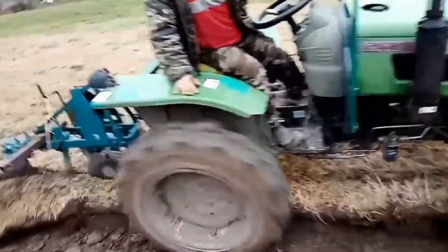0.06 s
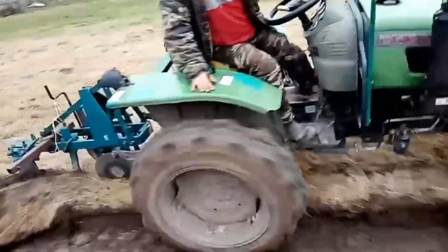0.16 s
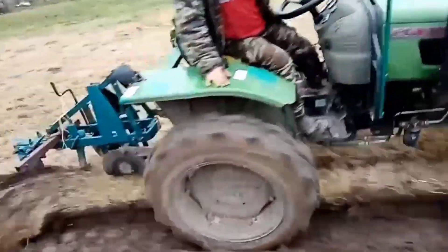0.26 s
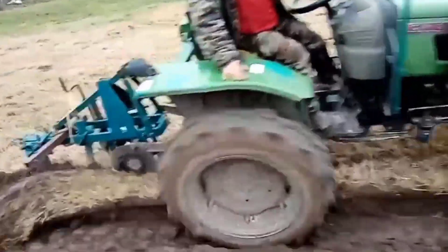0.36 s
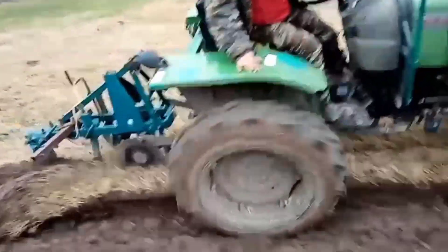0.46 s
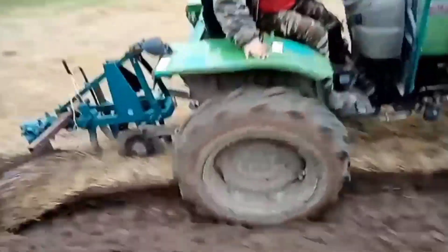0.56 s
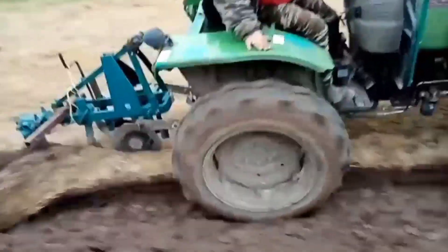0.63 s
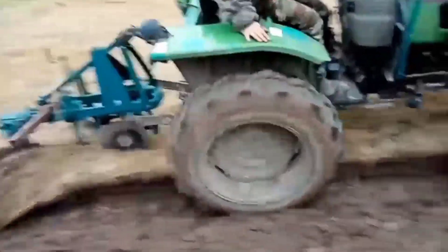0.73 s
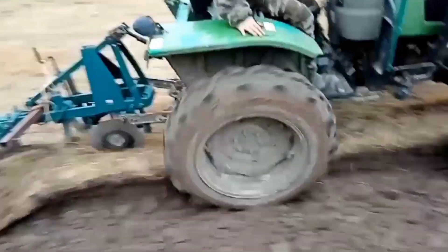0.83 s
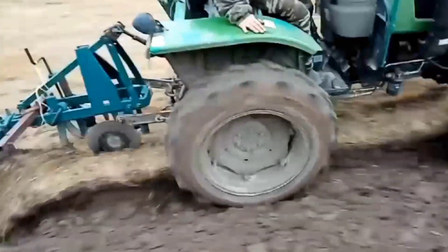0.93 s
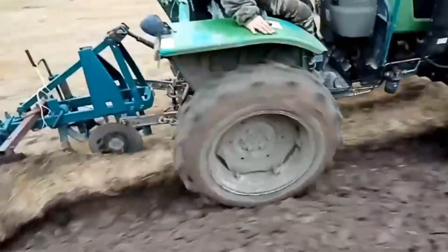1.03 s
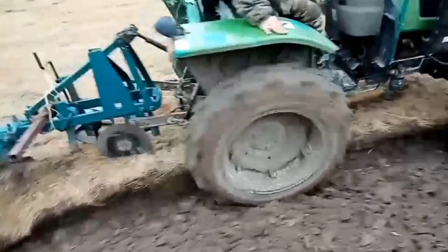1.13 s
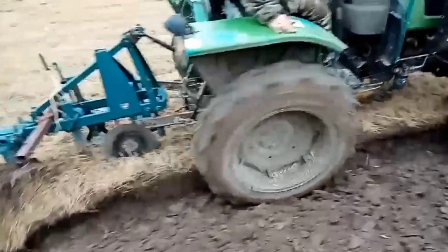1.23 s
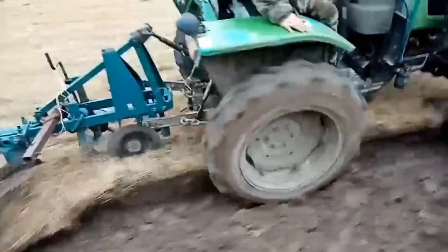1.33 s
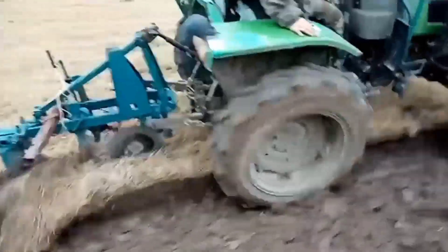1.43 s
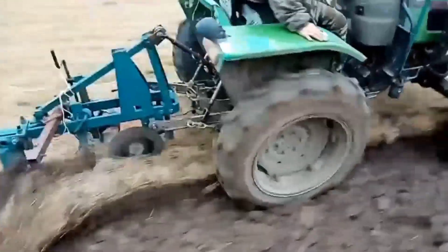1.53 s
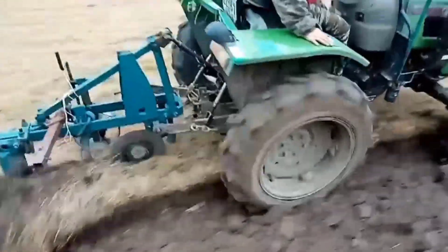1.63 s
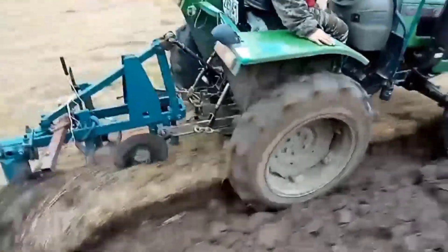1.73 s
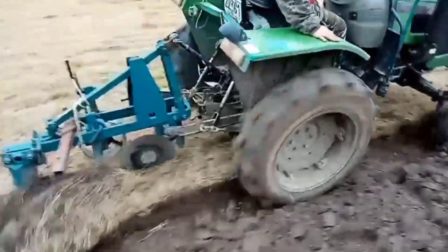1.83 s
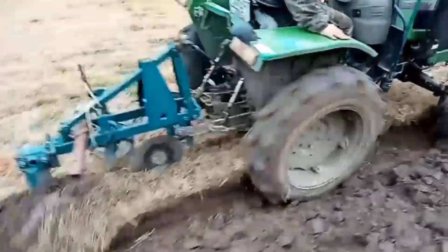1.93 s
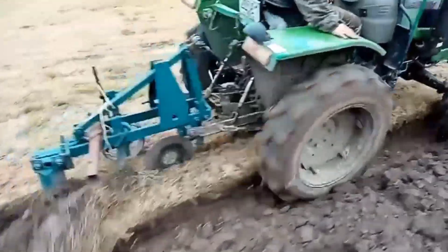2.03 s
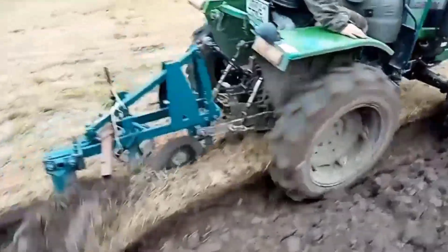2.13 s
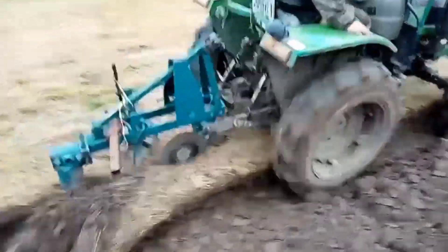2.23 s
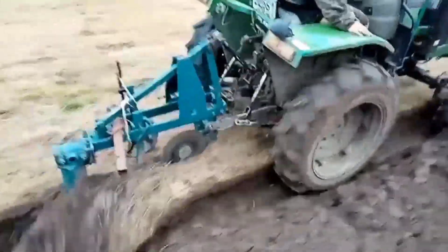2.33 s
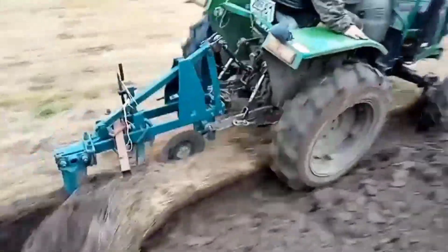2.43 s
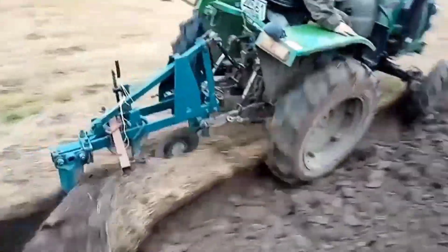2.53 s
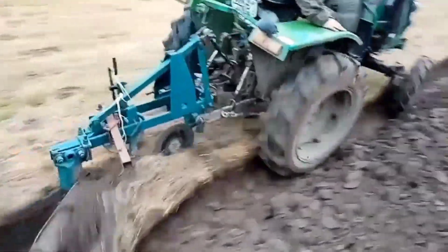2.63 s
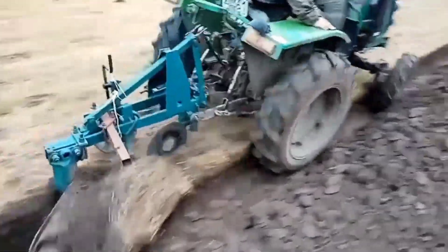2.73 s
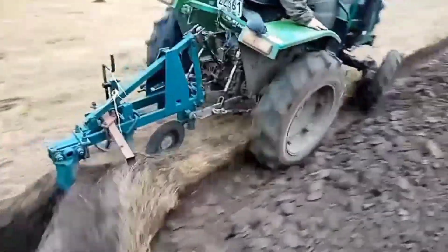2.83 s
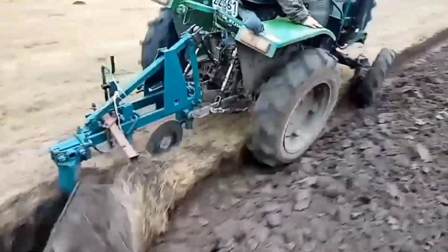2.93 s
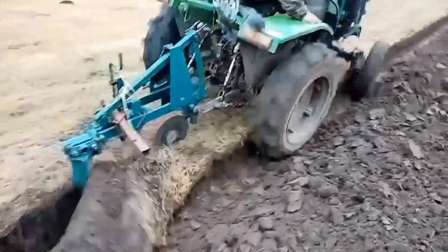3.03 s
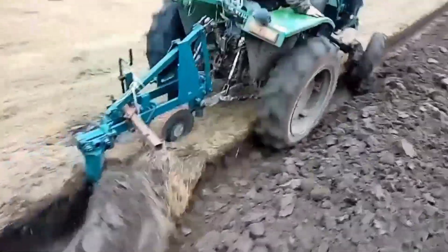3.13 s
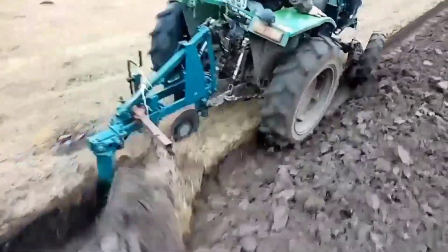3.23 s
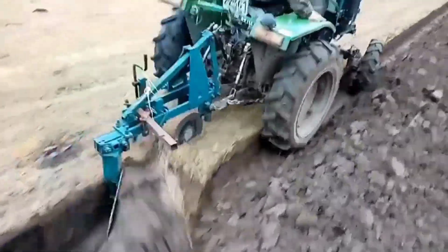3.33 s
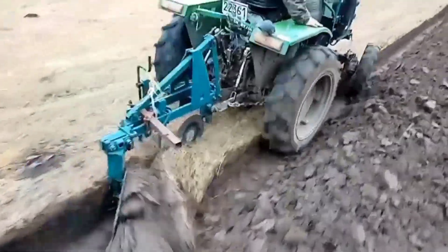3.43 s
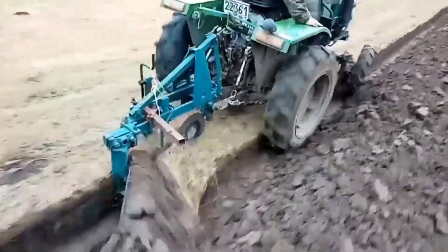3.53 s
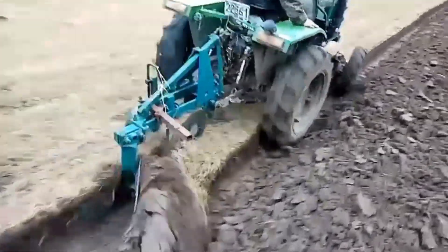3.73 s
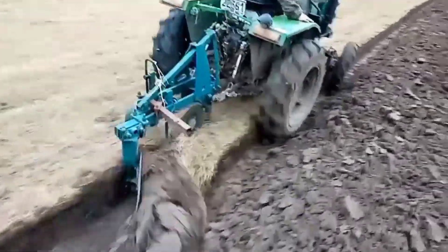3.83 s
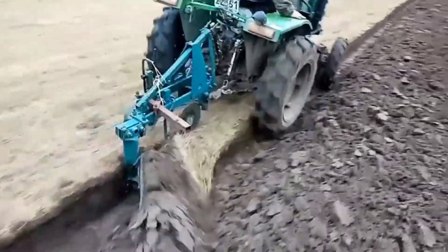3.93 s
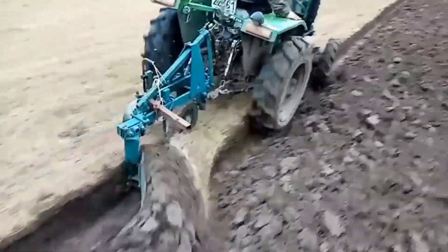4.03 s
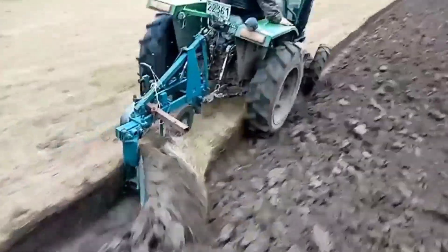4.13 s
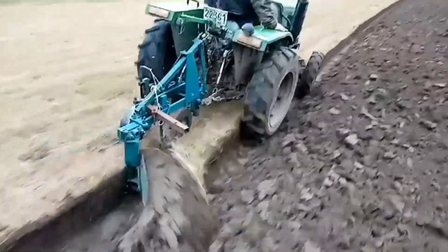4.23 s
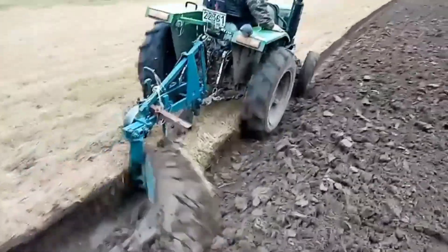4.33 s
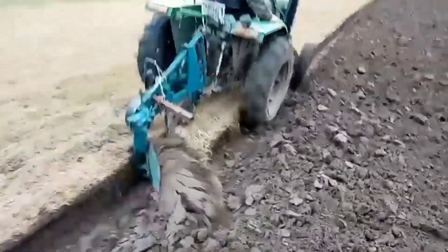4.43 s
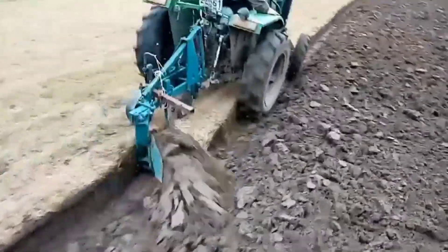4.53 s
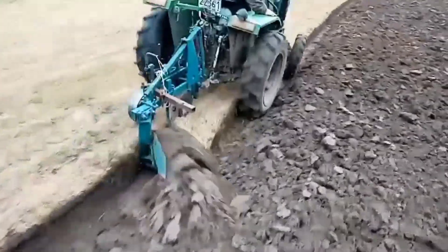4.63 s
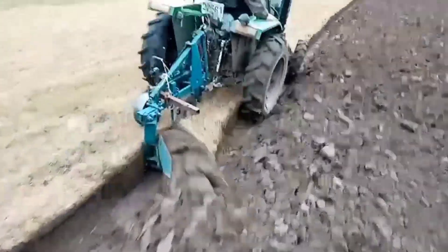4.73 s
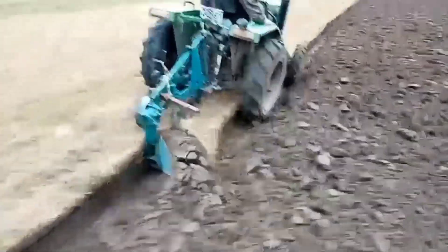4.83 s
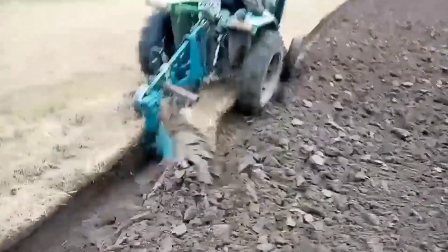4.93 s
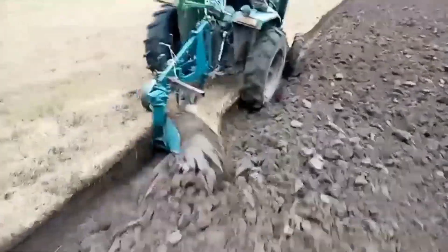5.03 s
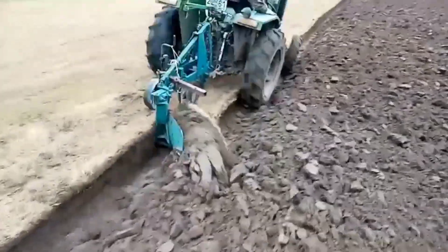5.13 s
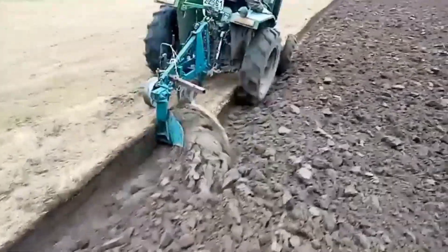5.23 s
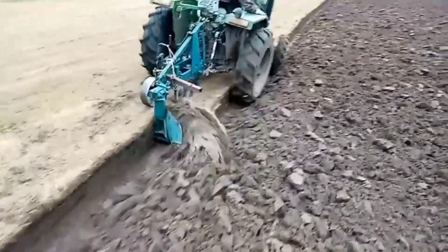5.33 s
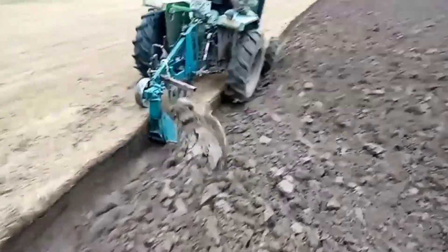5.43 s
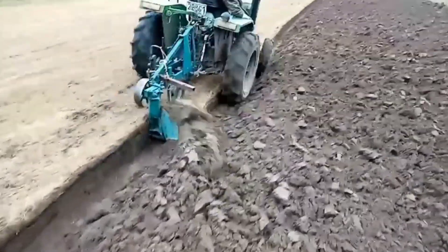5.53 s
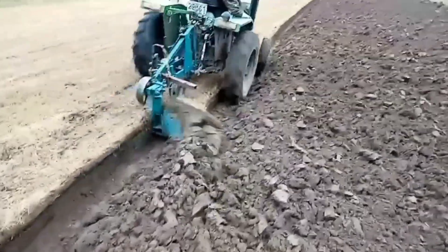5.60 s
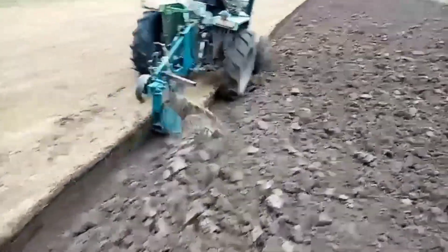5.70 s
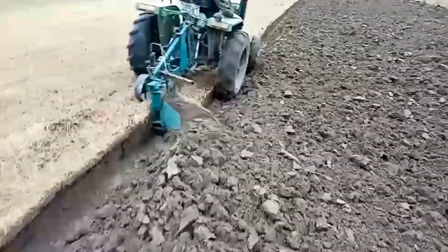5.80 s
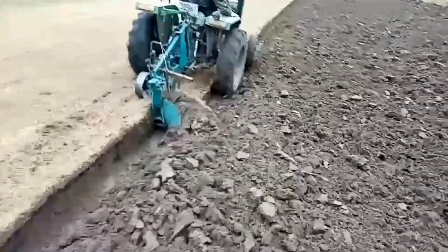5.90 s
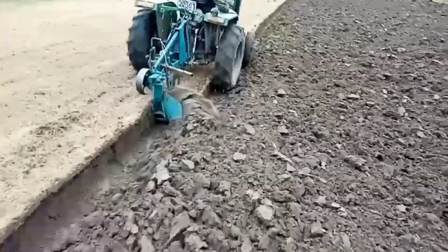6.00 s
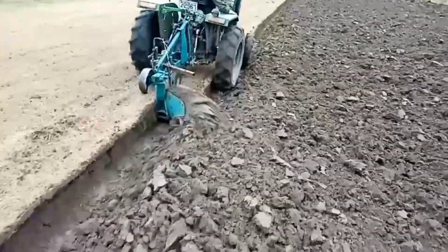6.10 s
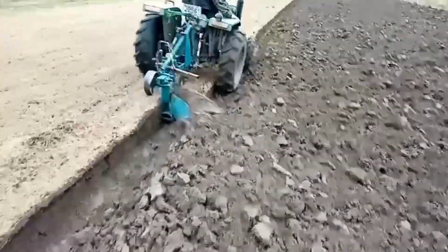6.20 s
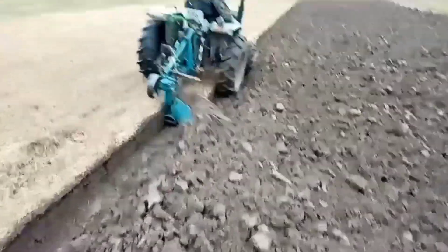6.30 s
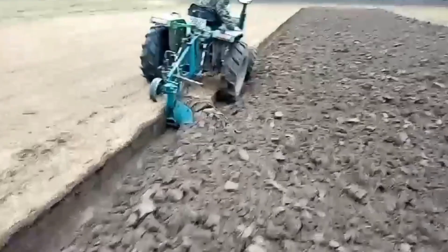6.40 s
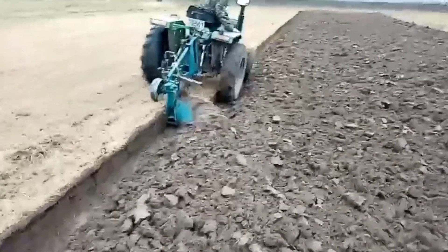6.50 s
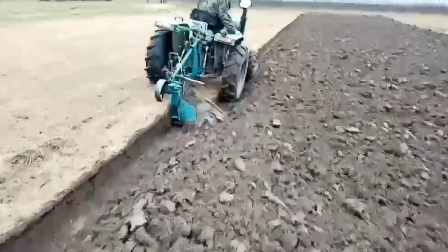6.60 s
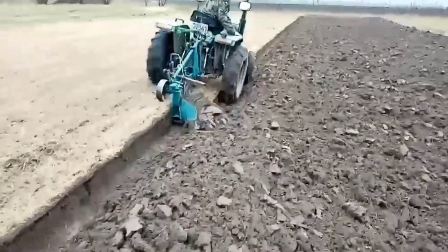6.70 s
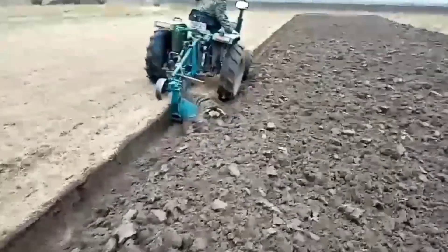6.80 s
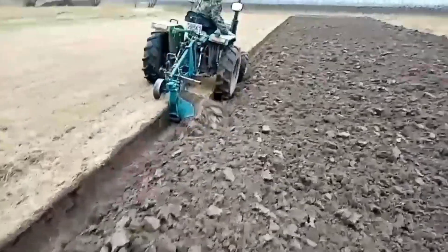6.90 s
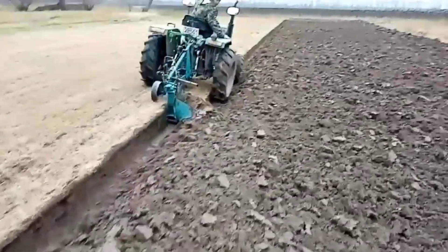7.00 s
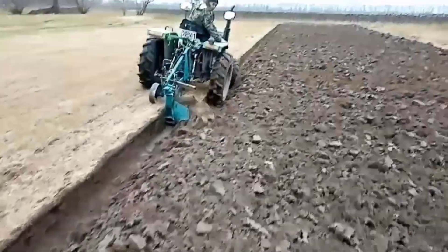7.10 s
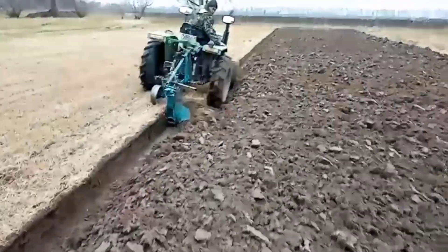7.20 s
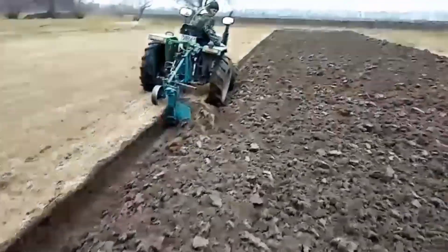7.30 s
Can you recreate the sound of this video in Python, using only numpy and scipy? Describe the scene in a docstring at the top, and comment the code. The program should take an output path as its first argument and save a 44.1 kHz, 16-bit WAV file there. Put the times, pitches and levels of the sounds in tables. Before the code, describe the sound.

Close by at first, a small tractor's diesel engine chugs, knocks and rattles, its speed sagging slightly with the strain of ploughing. As it draws away across the open field, the blade scrapes over stones in a handful of brief, high squeaks, followed by a short metallic ring. Turned earth crackles very faintly beneath the engine. The sound slowly becomes quieter and duller, but the low exhaust throb continues throughout.

```python
"""A small three-cylinder diesel tractor pulls a plough past the listener and away down the furrow.
Each firing sends a pressure pulse through the exhaust, which throbs at the pipe's resonances, and
excites the block, panels and valve gear, which knock, drone and clatter; gears whine with the engine.
The mouldboard turns crumbling sod and scrapes over stones by stick-slip friction.
Faint wind rumbles over the open field, and two spaced microphone ports pick up the scene."""
import sys
import numpy as np
from scipy import signal
from scipy.fft import rfft, irfft, next_fast_len
from scipy.io import wavfile
from scipy.ndimage import map_coordinates

SR = 44100
rng = np.random.default_rng(int(sys.argv[2]) if len(sys.argv) > 2 else 0)


def persist_wave(psi):
    """Save psi, clipped to +-1, as 16-bit WAV."""
    counts = np.round(np.clip(psi, -1, 1) * 32767).astype(np.int16)
    wavfile.write(sys.argv[1], SR, np.atleast_2d(counts).T)


N = 324135
TIME = np.arange(N) / SR


def amp(db):
    """Decibels to amplitude ratio."""
    return 10 ** (np.asarray(db) / 20)


def unit(x):
    """Normalisation to rms 1."""
    return x / np.sqrt(np.mean(x ** 2) + 1e-20)


def along(points, hz):
    """Interpolation of (frequency, value) points on a log axis."""
    frequencies, values = np.transpose(points)
    return np.interp(np.log(hz + 1), np.log(frequencies), values)


def curves(rows):
    """Linear interpolation in time of each column after the first."""
    times, *columns = np.transpose(rows)
    return [np.interp(TIME, times, column) for column in columns]


def wobble(rate):
    """Smooth random modulation, rate knots a second."""
    return map_coordinates(rng.standard_normal(int(N * rate / SR) + 4), [TIME * rate])


def swell(time, width):
    """Gaussian envelope centred on time."""
    return np.exp(-((TIME - time) / width) ** 2 / 2)


def between(side, rear, view):
    """Directivity: a blend from side-on (view 0) to behind (view 1)."""
    return side + np.clip(view, 0, 1) * (rear - side)


def filtered(x, response):
    """Zero-phase filtering by a function of frequency."""
    size = next_fast_len(N + SR // 2)
    return irfft(rfft(x, size) * response(np.fft.rfftfreq(size, 1 / SR)), size)[..., :N]


def resonance(x, hz, width_hz):
    """Forced response of one damped mode, at rms 1."""
    return unit(signal.lfilter(*signal.iirpeak(hz, hz / width_hz, SR), x))


def rung(x, spectrum, size=8192):
    """Convolution with a minimum-phase body of this (frequency, level) spectrum."""
    cepstrum = irfft(np.log(amp(along(spectrum, np.fft.rfftfreq(size, 1 / SR)))))
    cepstrum[1:size // 2] *= 2
    cepstrum[size // 2 + 1:] = 0
    impulse_response = irfft(np.exp(rfft(cepstrum)))[:size // 2]
    return signal.fftconvolve(np.atleast_2d(x), impulse_response[None], axes=1)[:, :N]


def radiated(x, table, view):
    """Directional radiation: a body's spectrum shifts with the view; rms 1."""
    side = unit(rung(x, np.array(table)[:, [0, 1]]))
    rear = unit(rung(x, np.array(table)[:, [0, 2]]))
    return unit(between(side, rear, view))


PASS_S, NEAREST_M, SPEED_M_PER_S = 0.67, 3.78, 1.265
# carry: (level when nearest [dB], gain from behind [dB], loss per doubling of distance [dB])
BARK_CARRY, DRONE_CARRY = (-25.5, 7.5, 12.35), (-29, 8.44, 8.17)
KNOCK_CARRY, CLATTER_CARRY = (-25, 0.45, 7.2), (-24, 3.7, 13.12)
def carried(carry, view):
    """Distance loss and directivity give the level in dB of a part passing in a straight line."""
    near_db, rear_db, loss_db = carry
    distance = np.hypot(NEAREST_M, SPEED_M_PER_S * (TIME - PASS_S))
    return near_db + rear_db * view - loss_db * np.log2(distance / NEAREST_M)


# likeness of the two ports: (frequency [Hz], correlation [0-1])
PORT_CORRELATION = [(300, 0.98), (900, 0.8), (1250, 0.3), (1650, 0.84), (2100, 0.05), (3200, 0.3),
                    (5000, 0.35), (9000, 0.37)]
def port_noise():
    """Partial coherence: white noise at two spaced ports is alike in the bass, less so in the treble."""
    def mixing(hz):
        angle = np.arccos(np.clip(along(PORT_CORRELATION, hz), 0, 1)) / 2
        return np.array([np.cos(angle), np.sin(angle)])
    mid, side = filtered(rng.standard_normal((2, N)), mixing)
    return np.array([mid + side, mid - side])


def wind(level_db):
    """Turbulence: a rumble with most of its energy at low frequencies."""
    return amp(level_db) * unit(filtered(port_noise(), lambda hz: 1 / (1 + hz / 120) ** 2))


# spectrum of crumbs and scrapes: (frequency [Hz], gain [dB])
GRIT_SPECTRUM = [(1500, -36), (4000, 10.5), (6000, 18.5), (8000, 9.5), (11000, 12), (15500, -34)]
def soil(level_db):
    """Shot noise: roots snap and crumbs fall in random clumps as the sod rolls over."""
    crumbs_per_s = 700 * np.exp(0.7 * wobble(16))
    falls = rng.random(N) < crumbs_per_s / SR
    crumbs = falls * rng.standard_normal((2, N)) * amp(2 * rng.standard_normal(N))
    return amp(level_db) * unit(rung(crumbs, GRIT_SPECTRUM))


# stones on the mouldboard: (time [s], scrape [dB], squeak before boost [dB], width [s], pitch [Hz])
STONE_CONTACTS = [(1.813, -28.5, -37, 0.015, 5720), (2.785, -26, -32, 0.014, 5500),
                  (2.918, -30, -27, 0.014, 5420), (3.082, -28.5, -36, 0.019, 6300),
                  (3.21, -33, -39, 0.019, 5200), (3.414, -31, -40, 0.0085, 4980),
                  (3.683, -24.5, -26, 0.019, 6350)]
def stones(squeak_boost_db=4.5):
    """Stick-slip friction: each stone grates along the steel with a short, rough squeak."""
    out = np.zeros((2, N))
    grit = unit(rung(rng.standard_normal((2, N)) * amp(2.5 * wobble(500)), GRIT_SPECTRUM))
    judder = unit(amp(1.5 * wobble(130)))
    waver = 0.016 * wobble(450)
    for time, scrape_db, squeak_db, width, hz in STONE_CONTACTS:
        phase = 2 * np.pi * np.cumsum(hz * (1 + waver)) / SR
        squeak = unit(np.sin(phase) + amp(-15) * np.sin(2 * phase))
        out += swell(time, width) * (amp(scrape_db) * grit + amp(squeak_db + squeak_boost_db) * squeak)
    return judder * out


# swells of a thin steel part's tone: (time [s], level [dB], width [s])
SINGING_SPELLS = [(3.762, -30, 0.048), (5.7, -46.5, 0.42)]
def singing_steel(hz=1023, floor_db=-51.5):
    """Natural frequency: thin steel sings at its own pitch, whatever the engine speed."""
    envelope = amp(floor_db) + sum(amp(db) * swell(time, width) for time, db, width in SINGING_SPELLS)
    return envelope * amp(2 * wobble(14)) * np.sin(2 * np.pi * hz * TIME + 0.8 * wobble(14))


# shaft, pump and gear tones: (order [per engine cycle], level when nearest [dB],
# gain from behind [dB], loss per doubling of distance [dB])
GEAR_ORDERS = [(4, -52, 2, 1), (7, -46, 1, 1), (10, -46, 0, 3), (30, -39, 15, 9), (34, -44, 14, 9),
               (84, -37, 0, 7)]
def gear_whine(firings, view):
    """Engine orders: rotating parts hum unsteadily at multiples of the cycle rate."""
    cycles = firings / len(CYLINDER_LEVELS)
    out = np.zeros(N)
    for order, *carry in GEAR_ORDERS:
        twist = 0.0022 * wobble(25)
        level_db = carried(carry, view) + 1.3 * wobble(11)
        out += amp(level_db) * np.sin(2 * np.pi * order * (cycles + twist))
    return out


# cylinders in firing order: (exhaust [dB], knock [dB], clatter [dB])
CYLINDER_LEVELS = [(3.5, -7, -3.5), (3, -3, -2.5), (3.2, -2, -4)]
def strength(firings, column, scatter_db):
    """Combustion variability: each firing has its cylinder's level plus random scatter."""
    count = np.floor(firings).astype(int) + 3  # a cycle ahead, so never negative
    cylinder_db = np.array(CYLINDER_LEVELS)[count % len(CYLINDER_LEVELS), column]
    return amp(cylinder_db + scatter_db * rng.standard_normal(size=1024)[count])


def bursts(firings, column, rise, decay, bed, scatter_db):
    """Exponential decay after each firing, over a steady bed; rise and decay in firing periods."""
    age = firings % 1
    shape = unit((1 - np.exp(-age / rise)) * np.exp(-age / decay))
    return unit(np.hypot(bed, shape * strength(firings, column, scatter_db)))


def rattle(firings, repeat, alike_db, size=2560):
    """Periodic plus random excitation: of many small impacts, the share repeat recurs every cycle."""
    orders = np.arange(size // 2 + 1)
    weight = amp(alike_db * (orders % len(CYLINDER_LEVELS) == 0))  # orders common to all cylinders
    pattern = irfft(weight * np.exp(2j * np.pi * rng.random(len(orders))))
    periodic = map_coordinates(pattern, [firings / len(CYLINDER_LEVELS) % 1 * size], mode="grid-wrap")
    return np.sqrt(repeat) * unit(periodic) + np.sqrt(1 - repeat) * port_noise()


# valve gear and injectors: (frequency [Hz], gain side-on [dB], gain from behind [dB])
VALVE_SPECTRUM = [(1500, -15.5, -34.5), (3330, -4.5, -0.5), (4200, -7, -1.5), (4950, -5.5, 4),
                  (5450, -9, -0.5), (6350, 1, 5), (6730, 0.5, 4), (9000, -7.5, -6.5), (9200, -15.5, -40.5),
                  (10000, -11, -9), (12200, -11.5, -11.5), (15200, -8, -14.5)]
def valve_clatter(firings, level_db, view):
    """Impact noise: valves and injectors tick in step with the firings."""
    ticks = bursts(firings - 0.6, column=2, rise=0.05, decay=0.36, bed=1.5, scatter_db=2.0)
    return amp(level_db + 0.79 * wobble(20)) * radiated(ticks * port_noise(), VALVE_SPECTRUM, view)


# panels and gearbox housing: (frequency [Hz], gain side-on [dB], gain from behind [dB])
PANEL_SPECTRUM = [(58.6, -7, -41), (127, -0.5, 1), (234, -2.5, 0.5), (350, -5.5, -7), (433, -6, -33.5),
                  (451, 1, -25), (465, -5.5, 1.5), (604, -0.5, -1.5), (744, -1, -2), (1060, -1.5, -5.5),
                  (1118, -8, -15), (1610, -2.5, -2), (3000, -44, -68)]
def chassis_drone(firings, level_db, view):
    """Forced vibration: each firing shakes the housings and panels into a coarse drone."""
    shake = bursts(firings - 0.57, column=1, rise=0.028, decay=0.56, bed=2.4, scatter_db=1.0)
    force = shake * rattle(firings, repeat=0.38, alike_db=9.5)
    return amp(level_db) * radiated(force, PANEL_SPECTRUM, view)


# ring of the block: (frequency [Hz], gain side-on [dB], gain from behind [dB])
BLOCK_SPECTRUM = [(300, -18, -43), (905, -21.5, -10), (1205, -7.5, -11), (1370, -3, -1), (1494, -0.5, 4.5),
                  (1550, -2.5, -1), (1730, 2, 3.5), (1825, -0.5, -9.5), (2190, 0, -1), (2510, -5.5, -14),
                  (2940, -5.5, -8), (3470, -28.5, -19.5), (6300, -36, -40.5)]
# thin covers: (frequency [Hz], bandwidth [Hz], side-on [dB re block], from behind [dB re block])
COVER_MODES = [(2170, 70, -23, -6), (2990, 150, -22, -10.5), (4215, 70, -24, -29), (6325, 55, -14, -21),
               (6930, 50, -18, -23)]
# spells of harder knocking: (time [s], added level [dB], width [s])
HARD_SPELLS = [(1.98, 1, .2), (3.98, 1.5, 0.37), (6.62, 1, 0.26)]
def block_knock(firings, level_db, view):
    """Modal ringing: diesel knock excites the block and the thin covers bolted to it."""
    knock = bursts(firings - 0.6, column=1, rise=0.04, decay=0.27, bed=1.0, scatter_db=1.6)
    body = radiated(knock * rattle(firings, repeat=0.2, alike_db=8.5), BLOCK_SPECTRUM, view)
    shaking = knock * port_noise()
    covers = np.zeros((2, N))
    for hz, width_hz, side_db, rear_db in COVER_MODES:
        cover_db = between(side_db, rear_db, view) + 0.72 * wobble(6)
        covers += amp(cover_db) * resonance(shaking, hz, width_hz)
    spell_db = sum(db * swell(time, width) for time, db, width in HARD_SPELLS)
    return amp(level_db + spell_db) * (body + covers)


# silencer and tailpipe: (frequency [Hz], gain side-on [dB], gain from behind [dB])
PIPE_SPECTRUM = [(20, -26.5, -28), (54, -23.5, -28), (75.4, -14.5, -26), (114, -7, -10.5), (139, 4.5, -3.5),
                 (157.4, 2.5, -1.5), (207, -6.5, -3.5), (256.4, -9.5, -9.5), (309.2, -11.5, -15),
                 (374, -26, -24), (428, -36, -29.5), (910, -53.5, -47.5)]
# the low boom dips near 2 s, comes back a little, then holds: (time [s], level before boost [dB])
BOOM_LEVEL = [(0.05, -25.5), (1.26, -29.5), (2.18, -33), (2.4, -30.5), (6.88, -30.5), (7.28, -31.5)]
def exhaust(firings, bark_db, view, crossover_hz=128, boom_boost_db=1):
    """Pipe resonance: one puff per firing rings the pipe; the low boom carries further than the bark."""
    opening = firings - 0.39
    onsets = np.diff(np.floor(opening), prepend=np.floor(opening[0]))
    puffs = onsets * strength(opening, column=0, scatter_db=0.48)
    pipe = -radiated(puffs - puffs.mean(), PIPE_SPECTRUM, view)
    boom = filtered(pipe, lambda hz: 1 / (1 + (hz / crossover_hz) ** 16))
    boom_db = curves(BOOM_LEVEL)[0] + boom_boost_db
    return amp(boom_db) * unit(boom) + amp(bark_db) * unit(pipe - boom)


# engine speed sags in tough sod and the governor pulls it back: (time [s], firing rate [Hz])
FIRING_RATE = [(0.0, 52.96), (0.25, 51.71), (0.54, 52.15), (1.01, 50.81), (1.33, 52.13), (1.8, 51.38),
               (1.97, 52.08), (3.38, 52.16), (3.71, 51.23), (4.56, 52.36), (4.92, 51.39), (5.47, 52.15),
               (6.2, 51.74), (6.31, 52.32), (6.81, 50.72), (7.1, 51.77), (7.35, 50.64)]
# the tractor's bearing: (time [s], view [0 side-on, 1 behind], lag of the right port [ms])
BEARING = [(0, 0.061, 0.75), (2, 0.072, 0.73), (3.2, 0.48, 0.84), (5, 0.62, 0.932), (7.35, 0.61, 0.98)]
GOVERNED_HZ, KNOCK_DB_PER_HZ = 52.2, 0.3  # the labouring engine knocks harder as it slows
def scene():
    """Superposition: distance, view and load set the levels; the tractor reaches the left port first."""
    firing_hz, = curves(FIRING_RATE)
    firings = np.cumsum(firing_hz) / SR - 0.13  # engine phase, counted in firings
    view, lag_ms = curves(BEARING)
    knock_db = carried(KNOCK_CARRY, view) + KNOCK_DB_PER_HZ * (GOVERNED_HZ - firing_hz)
    clatter_db = carried(CLATTER_CARRY, view)
    tractor = (exhaust(firings, carried(BARK_CARRY, view), view)
               + chassis_drone(firings, carried(DRONE_CARRY, view), view)
               + block_knock(firings, knock_db, view)
               + valve_clatter(firings, clatter_db, view)
               + singing_steel() + gear_whine(firings, view))
    left, right = tractor + soil(clatter_db - 11.5) + stones()
    right = map_coordinates(right, [np.arange(N) - lag_ms * SR / 1000], mode="mirror")
    return np.array([left, right]) + wind(level_db=-72)


# the duller left port: (frequency [Hz], gain [dB re right port])
LEFT_RESPONSE = [(100, -3.5), (800, -4), (1300, -3.5), (2100, -9.5), (3300, 0.5), (5500, -4), (6500, -7.5),
                 (8200, -4), (9500, -11), (12000, -26), (15000, -33)]
def record(dry, resonance_hz=15200, cutoff_hz=15750):
    """Frequency response: the ports resonate in the top treble, the left is muffled, the band ends."""
    def response(hz):
        peak = 1 + amp(6.0) / (1 + ((hz - resonance_hz) / 650) ** 4)
        colour = np.array([amp(along(LEFT_RESPONSE, hz)), np.ones_like(hz)])
        return colour * peak * (hz < cutoff_hz)
    return filtered(dry, response)


dry = scene()
out = record(dry)
persist_wave(out)
```